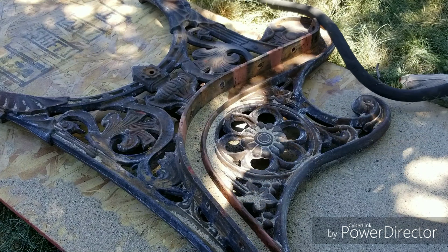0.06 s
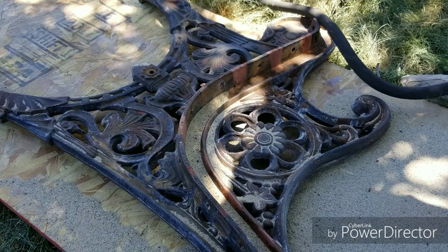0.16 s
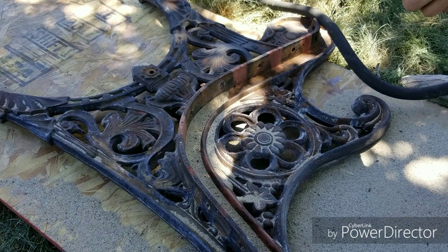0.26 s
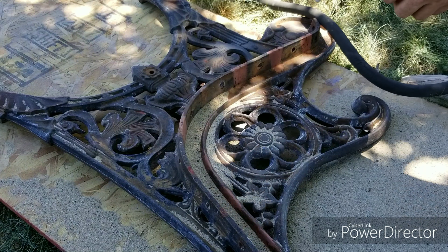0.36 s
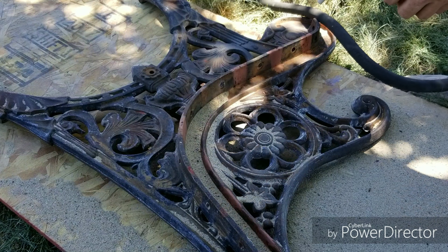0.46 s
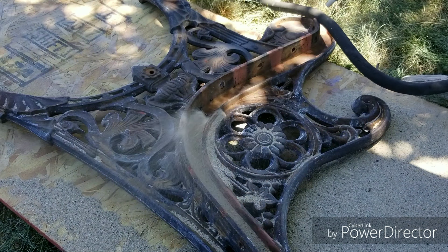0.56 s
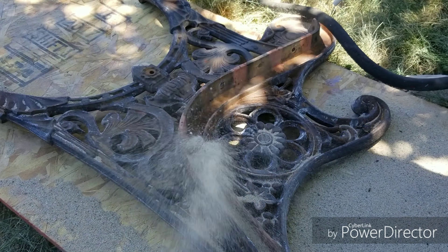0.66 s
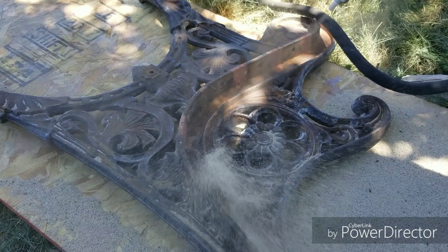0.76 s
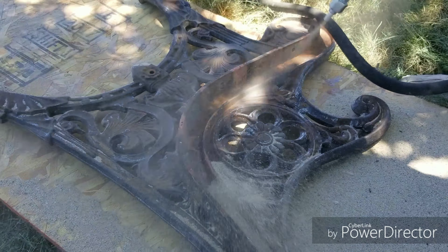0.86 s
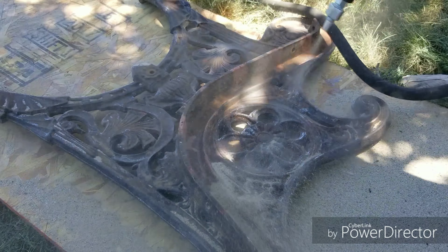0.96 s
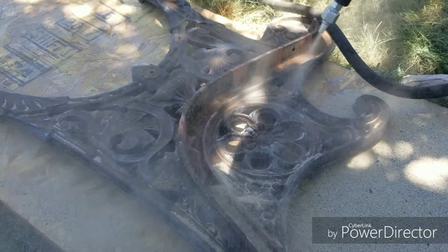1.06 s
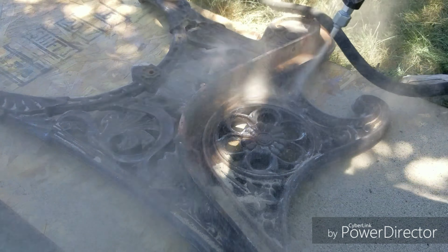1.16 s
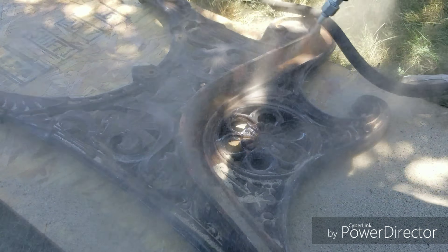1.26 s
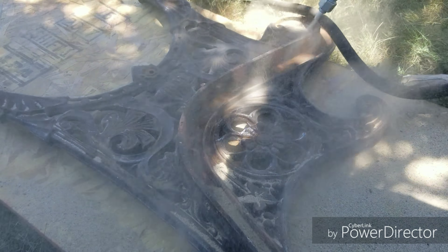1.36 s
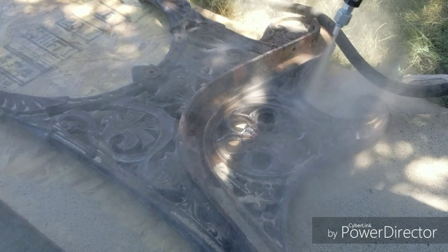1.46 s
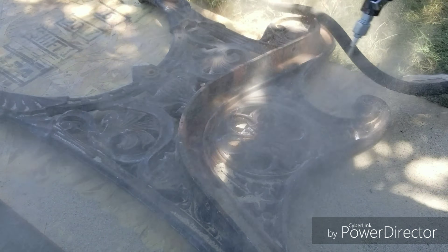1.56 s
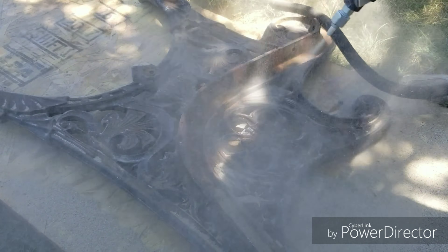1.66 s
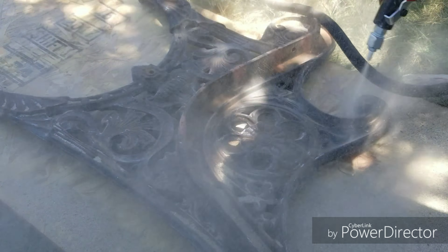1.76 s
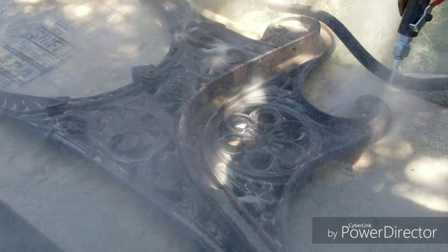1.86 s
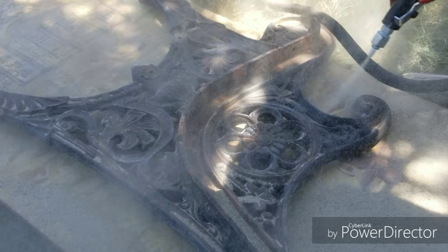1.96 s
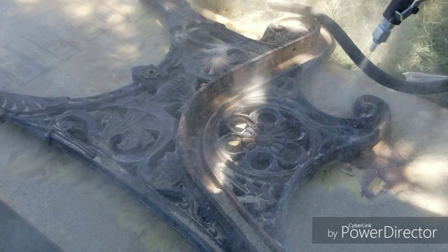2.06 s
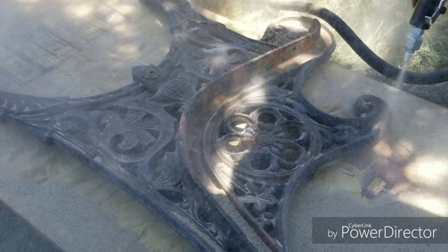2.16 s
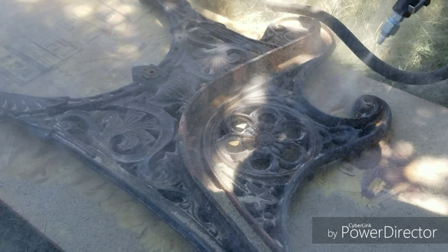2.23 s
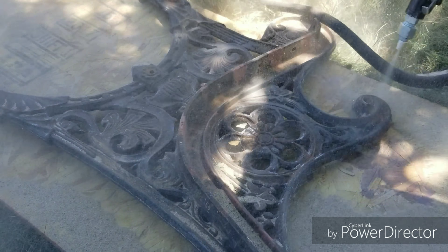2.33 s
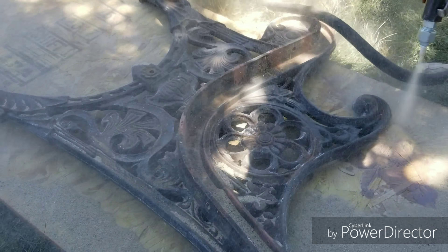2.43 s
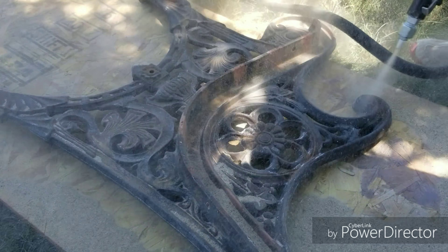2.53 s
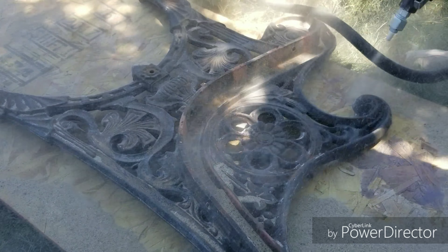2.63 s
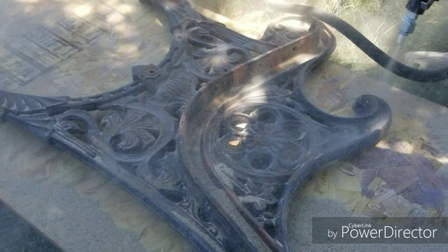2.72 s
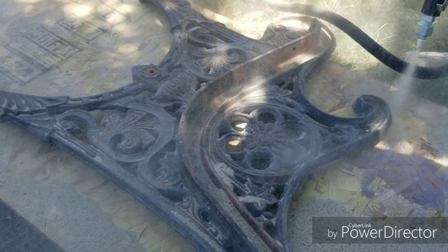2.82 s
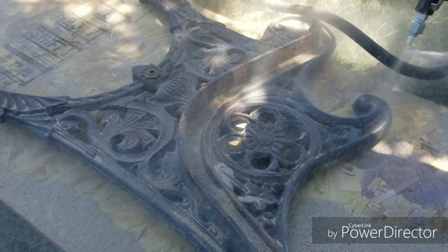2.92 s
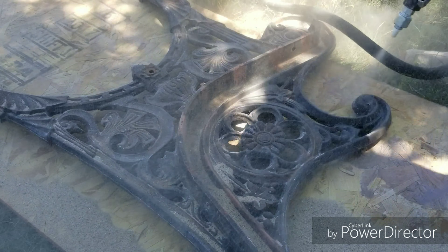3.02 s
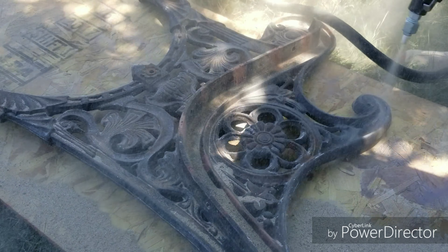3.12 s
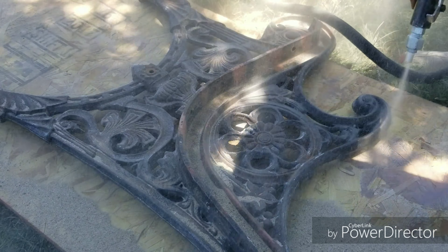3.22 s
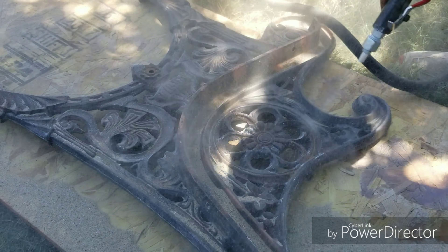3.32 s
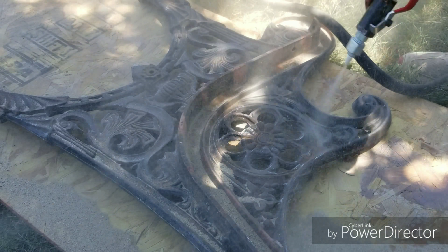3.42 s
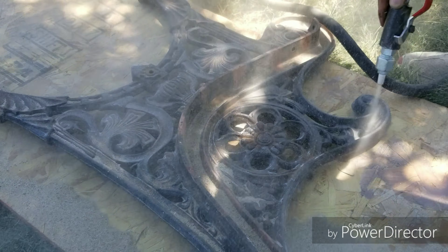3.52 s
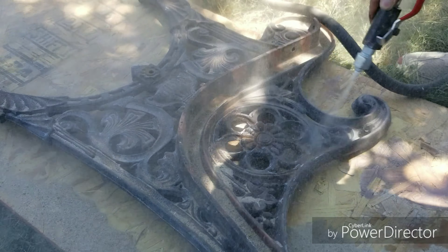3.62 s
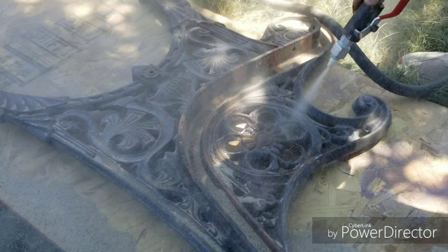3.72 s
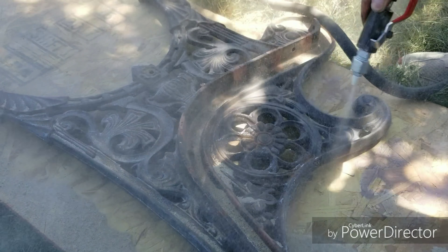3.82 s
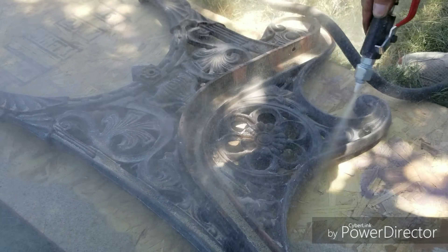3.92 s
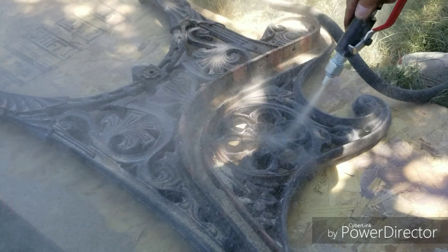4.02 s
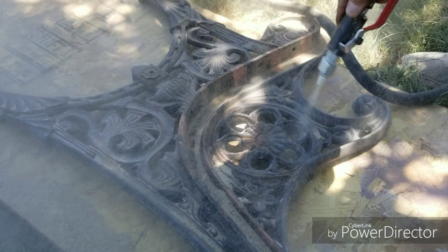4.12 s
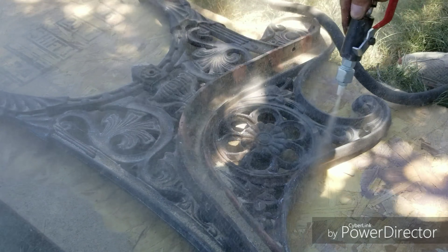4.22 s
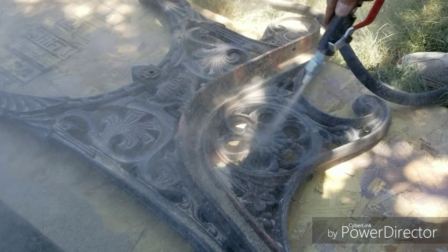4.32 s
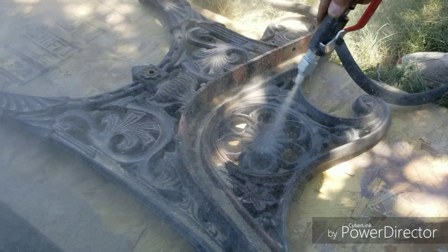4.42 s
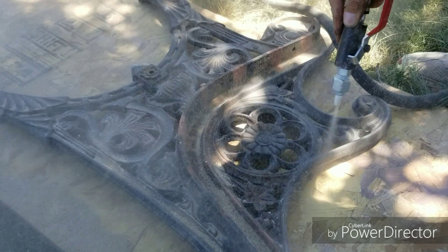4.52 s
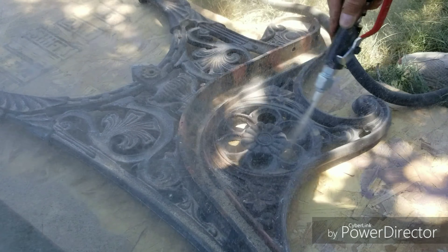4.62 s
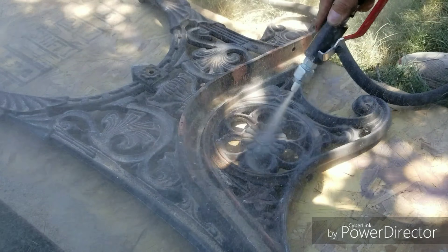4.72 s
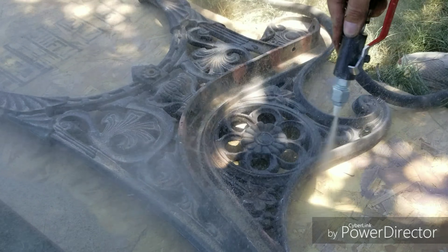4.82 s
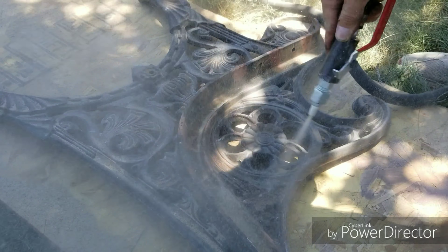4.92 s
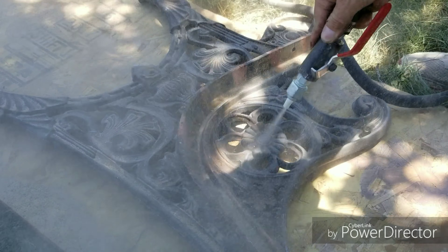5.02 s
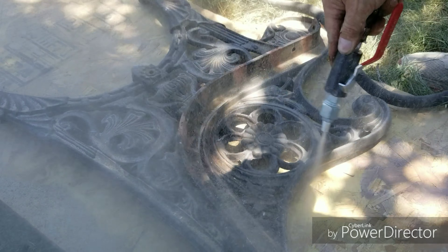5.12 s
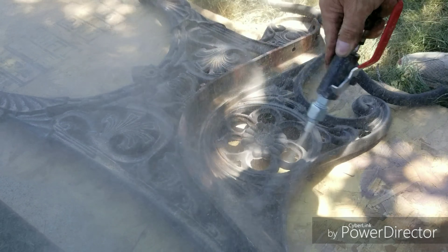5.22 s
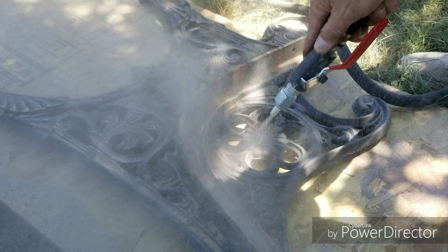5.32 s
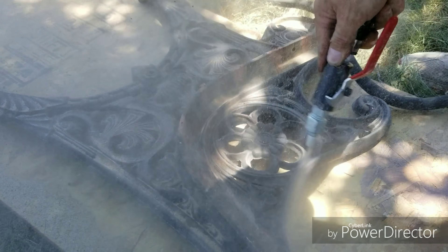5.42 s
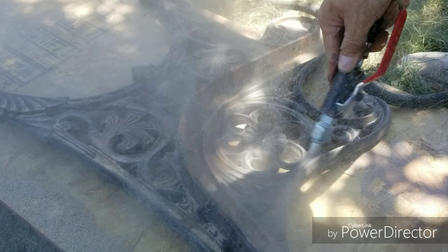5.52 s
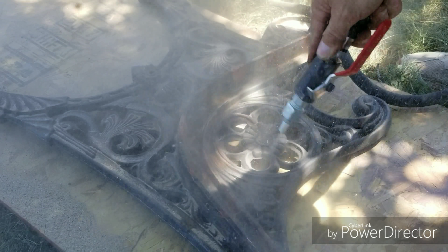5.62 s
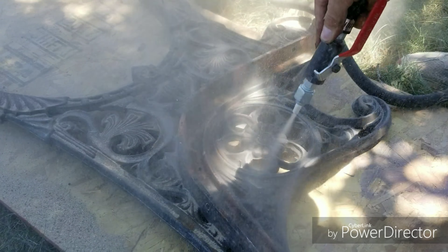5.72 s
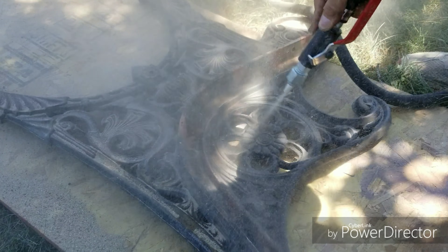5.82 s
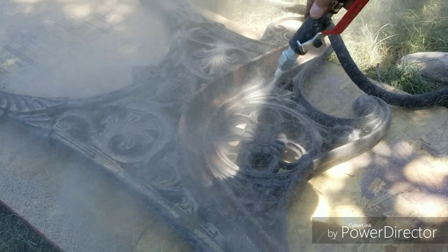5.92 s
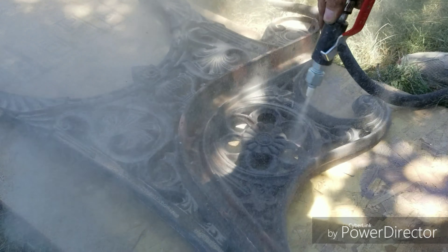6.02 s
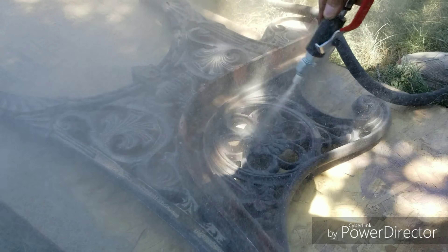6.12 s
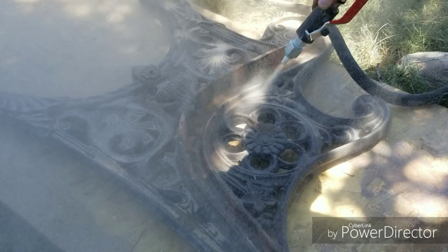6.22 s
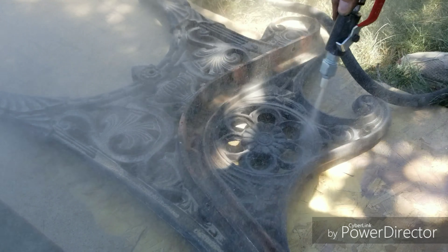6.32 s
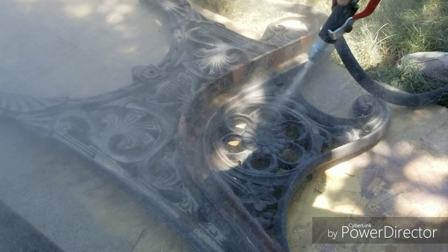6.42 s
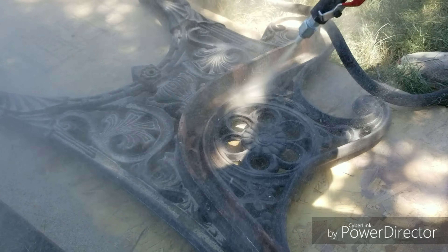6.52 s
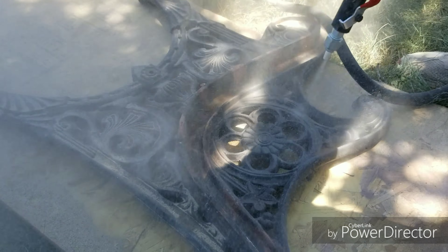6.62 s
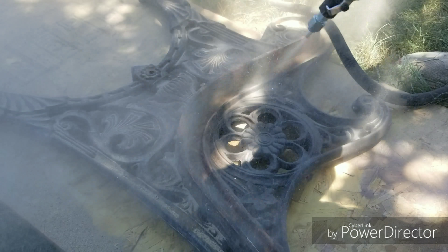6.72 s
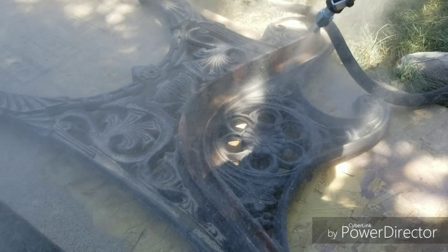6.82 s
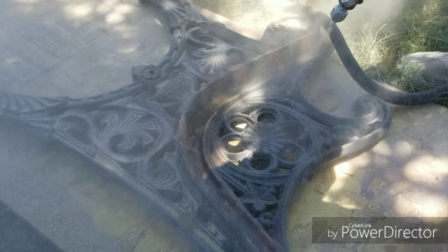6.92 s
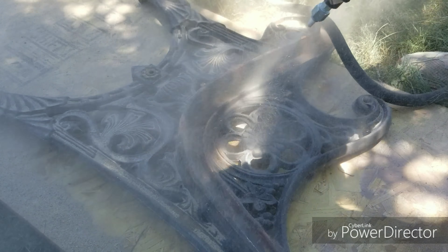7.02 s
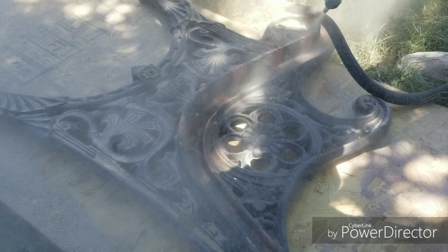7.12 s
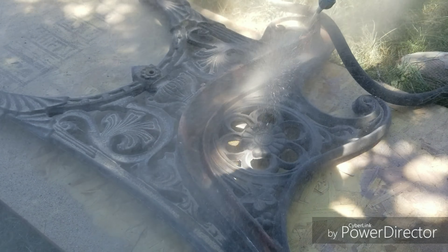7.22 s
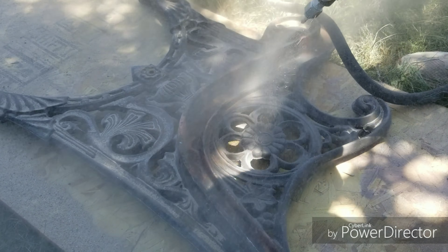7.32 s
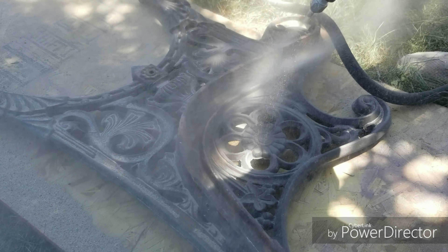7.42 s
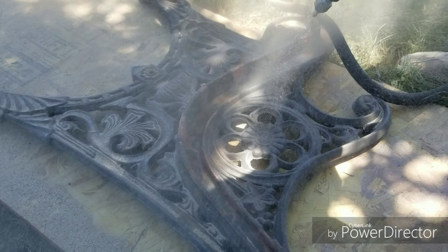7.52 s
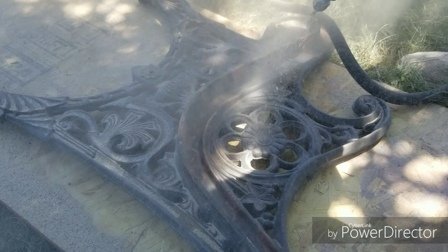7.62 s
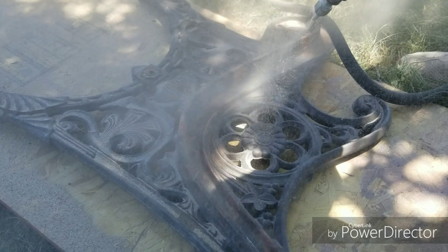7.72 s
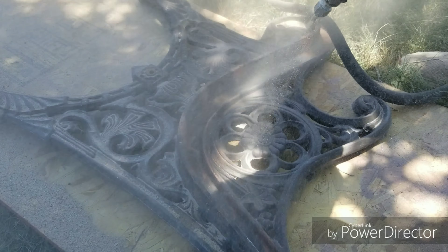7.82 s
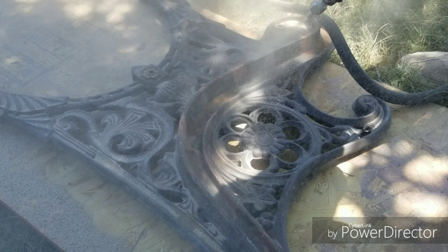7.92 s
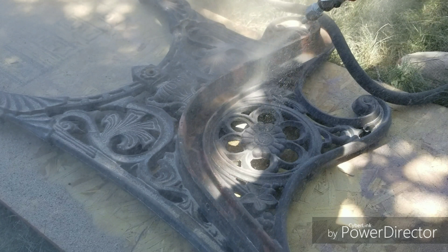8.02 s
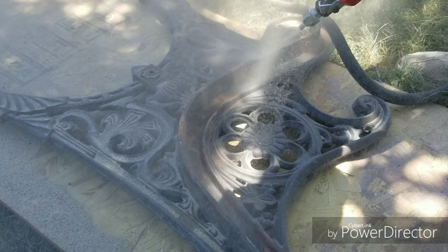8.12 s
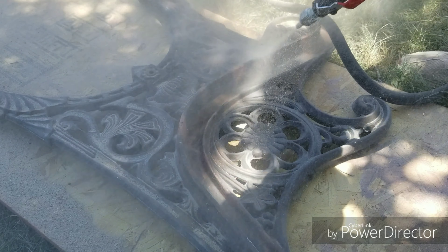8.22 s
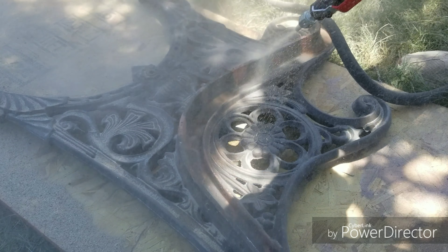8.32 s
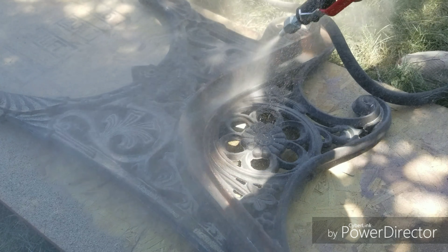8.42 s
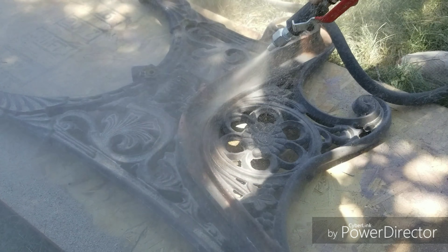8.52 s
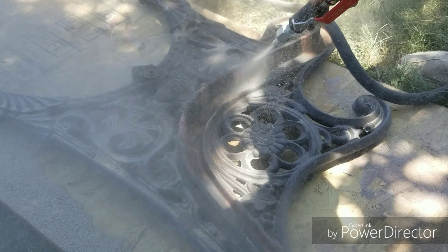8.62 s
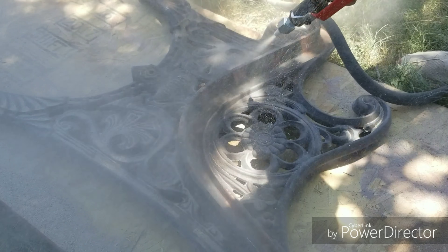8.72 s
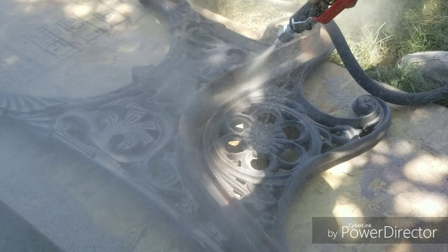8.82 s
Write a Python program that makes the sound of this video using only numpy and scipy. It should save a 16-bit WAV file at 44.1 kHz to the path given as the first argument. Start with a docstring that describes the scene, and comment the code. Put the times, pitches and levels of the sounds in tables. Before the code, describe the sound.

Quiet leaking air and a far rumble come first, then a sudden, dense jet of air and sand buries them. Sharp nozzle hiss, grains rattling finely on iron and a coarse mid roar in its hollows fluctuate in quick irregular slugs. Occasional soft low bumps of gusting air hit the microphones. Open air without reverberation, heard an arm's length away on a two-microphone phone; the blast continues to the end.

```python
"""Outdoors, a fitting leaks singing air over a distant rumble, both shaped from noise, until the gun's valve opens.
The leak and rumble then sink under the blast, taken an arm's length from a two-microphone phone.
Sand reaches a cast-iron piece in slugs, about eleven a second, with short lulls and jumps in level as the gun
sweeps: the nozzle hisses, grains patter on the iron and the jet roars in its hollows, all from uneven grains.
Now and then a gust off the iron bumps the phone with a few soft low cycles."""
import sys
import numpy as np
from scipy import signal
from scipy.fft import rfft, irfft, next_fast_len
from scipy.io import wavfile
from scipy.ndimage import uniform_filter1d

SR = 44100
rng = np.random.default_rng(int(sys.argv[2]) if len(sys.argv) > 2 else 0)


def waveform_to_disk(signal):
    """Save audio, clipped to [-1, 1], as 16-bit WAV at the path in sys.argv[1]."""
    frames = np.transpose(np.atleast_2d(signal))
    scaled = np.clip(frames, -1, 1) * 32767
    samples = np.round(scaled).astype(np.int16)
    wavfile.write(sys.argv[1], SR, samples)


N = 391166

# Distant rumble, spectrum shape: pitch_hz, relative density_db (per Hz)
RUMBLE_SHAPE = [(15, -42), (25, -30), (52, -10.5), (75, -8.5), (129, -14), (170, -18.5), (201, -19),
                (267, -29), (326, -25), (533, -34), (689, -26), (1610, -34), (2800, -34), (3640, -67),
                (6160, -120)]
# Pipework resonances of the leak: pitch_hz, width_hz, relative level_db, left_minus_right_db
LEAK_MODES = [(3210, 200, -51.5, -2), (3860, 500, -73, -1), (5280, 140, -52, 1), (6440, 700, -62, -3),
              (7560, 110, -47, -14), (9800, 320, -50.5, -7), (10800, 640, -47.5, -2), (13300, 310, -42, 0),
              (14750, 600, -44, -5)]
# Gusts off the iron bump the phone: start_s, envelope peak level_db, pitch_hz, left_minus_right_db
GUST_THUMPS = [(1.523, -50, 334, -1.5), (1.663, -44, 282, -1.0), (2.219, -47, 334, -3.0),
               (2.374, -48, 272, -2.5), (2.501, -45, 218, -1.0), (3.308, -39, 237, -3.5),
               (3.458, -41, 299, -1.0), (3.569, -41, 336, -1.0), (3.733, -40, 320, -2.0),
               (4.029, -36, 270, -2.0), (4.147, -46, 296, -3.5), (4.301, -40, 323, -3.0),
               (4.518, -44, 291, -3.0), (4.715, -46, 307, -1.5), (4.892, -37, 256, -2.0),
               (5.031, -42, 275, -2.0), (5.244, -46, 253, -1.0), (5.627, -46, 196, -2.0),
               (5.716, -43, 339, -0.5), (5.812, -41, 318, -0.5), (6.087, -42, 234, -2.5),
               (7.257, -45, 318, -2.5), (7.638, -39, 326, -4.0), (7.903, -44, 318, -4.5),
               (8.409, -41, 320, -3.5), (8.524, -41, 334, -2.5)]
# Nozzle hiss, spectrum shape: pitch_hz, relative density_db (per Hz)
HISS_SHAPE = [(4200, -42), (6500, -7), (7800, -4), (8600, -7.5), (10000, -2.5), (11200, -2.5),
              (12000, -1.5), (13500, -1.5), (15000, 2), (16000, -3.5)]
# Grains on the iron, spectrum shape: pitch_hz, relative density_db (per Hz)
PATTER_SHAPE = [(1410, -20), (2400, -3), (2730, -1), (3590, -3.5), (5060, -2.5), (5750, -2), (7020, -2.5),
                (8190, -9.5), (9000, -7), (11700, -1.5), (19800, -120)]
# Jet in the hollows, spectrum shape: pitch_hz, relative density_db (per Hz)
ROAR_SHAPE = [(59, -59), (100, -25), (310, -10), (414, -11.5), (500, -4.5), (784, -8), (906, -7),
              (1510, -8), (2260, -10), (2730, -10.5), (3200, -16.5), (4160, -76), (7040, -120)]
# Stream between slugs, relative levels: time_s, hiss_db, patter_db, roar_db, low_over_roar_db
STEADY_STREAM = [(0.57, -14.5, -24, -40.5, -17), (0.7, -16, -22.5, -35, -11), (0.87, -14.5, -25, -39, -14),
                 (1.0, -21.5, -29, -37, -13), (1.2, -25.5, -29, -40, -14), (1.6, -30, -27, -38, -18),
                 (1.85, -34, -32.5, -39, -12), (2.3, -28.5, -28, -36.5, -8.5),
                 (3.0, -25, -28.5, -35.5, -10.5), (3.7, -35, -31, -41.5, -6.5), (4.3, -25, -31, -40.5, -9),
                 (5.0, -24.5, -31.5, -41.5, -11), (5.6, -29, -29, -37, -13),
                 (6.2, -20.5, -28.5, -37, -11.5), (6.8, -26.5, -25, -37.5, -9.5), (7.3, -23, -26, -39, -6),
                 (8.0, -23, -24, -29, -7), (8.87, -24.5, -23.5, -30.5, -10)]
# Slugs of sand: centre_s, half_length_s, roar pitch_hz, hiss_rise_db, patter_rise_db, roar_rise_db
SAND_SLUGS = [(0.656, 0.028, 1200, -1.5, 2, 4), (0.842, 0.032, 1200.0, -1, 2.5, 7),
              (0.895, 0.018, 1120.0, -1.5, 0, 14.5), (1.014, 0.011, 790.0, 3.5, 2.5, 5),
              (1.106, 0.011, 830.0, 5, 4.5, 10), (1.27, 0.02, 1280.0, -3, 2, 6),
              (1.519, 0.01, 960.0, -6, -1, 13), (1.624, 0.01, 1330.0, 0, 1.5, 0),
              (1.766, 0.013, 820.0, 2, 3.5, 5), (1.883, 0.012, 990.0, 0.5, 4, 7),
              (1.93, 0.013, 1780.0, 6, 7, 9), (2.01, 0.013, 1070.0, -1, 4, 11),
              (2.043, 0.018, 1260.0, 3, 3, 9), (2.104, 0.01, 650.0, 3.5, 3, 3),
              (2.165, 0.034, 960.0, 3, 1.5, 9.5), (2.246, 0.009, 860.0, 3, 4, 2),
              (2.318, 0.014, 784, 4, 0.5, 12), (2.39, 0.034, 970.0, 4, 2, 3.5),
              (2.45, 0.01, 1210.0, 7, 7, 14.5), (2.551, 0.0099, 1010.0, 6, 1.5, 14.5),
              (2.655, 0.018, 2570.0, 8, 0.5, 2), (2.77, 0.02, 1870.0, 4.5, -2, 0),
              (2.91, 0.025, 1000, 0.5, 0.5, 3), (3.012, 0.01, 870.0, 3, 1, 7),
              (3.088, 0.012, 1090.0, 2, 7, 8.5), (3.153, 0.015, 1000, 4, 0.5, 2),
              (3.262, 0.022, 1480.0, 5, 3, 4), (3.333, 0.026, 1020.0, 6.5, 3.5, 6),
              (3.403, 0.015, 1980.0, 7, 6, 12), (3.59, 0.037, 910.0, 6, 2.5, -0.5),
              (3.714, 0.025, 1150.0, 8, 1.5, 3.5), (3.769, 0.015, 1200.0, 8, 3, 8),
              (3.855, 0.015, 780.0, 9, 3, 7), (3.902, 0.02, 810.0, 9, 0, 6),
              (4.009, 0.029, 640.0, 5.5, -0.5, 2), (4.056, 0.0062, 1480.0, 5, 1, 8),
              (4.153, 0.026, 1120.0, 5, -1.5, 3), (4.205, 0.016, 1460.0, 2, 4.5, 14),
              (4.31, 0.014, 610.0, 4.5, 0.5, 10), (4.394, 0.019, 1500.0, 2, 5, 6.5),
              (4.467, 0.023, 760.0, 6, 1.5, 2), (4.564, 0.013, 1240.0, 3.5, 0, 5.5),
              (4.694, 0.0048, 1120.0, 7, 4.5, 13), (4.841, 0.031, 1350.0, 4, 5.5, 11.5),
              (4.959, 0.022, 1280, 0.5, 5, 11), (5.103, 0.016, 1370, 1, 5, 16),
              (5.278, 0.042, 1480.0, -0.5, 2, 7.5), (5.442, 0.015, 1430.0, 2, 2, 13.5),
              (5.585, 0.018, 1320.0, 7, 6, 13.5), (5.697, 0.03, 640.0, 6.5, 4, 2),
              (5.765, 0.012, 1360.0, 4, 4.5, 11.5), (5.902, 0.024, 1290.0, 5, 2, 9.5),
              (5.98, 0.016, 1140.0, 5, 1, 8), (6.043, 0.034, 1200, 0.5, 3, 9),
              (6.105, 0.016, 900.0, 4, 0.5, 1), (6.139, 0.0079, 700.0, 0, 4, 11),
              (6.287, 0.025, 880.0, 1.5, 2, 7), (6.396, 0.03, 720.0, 2, -0.5, 5),
              (6.507, 0.02, 1180.0, 3, 3, 4), (6.563, 0.01, 1380.0, 4, 4, 13),
              (6.712, 0.012, 1070.0, 7.5, 6, 13.5), (6.86, 0.027, 1800, -1, -0.5, 5.5),
              (6.912, 0.014, 1040.0, 6.5, 2, 11), (6.981, 0.0062, 820.0, 7, 3.5, 8),
              (7.035, 0.013, 1170.0, 6.5, 3, 17), (7.194, 0.01, 1550.0, 1, 5, 5),
              (7.239, 0.021, 1320.0, 1, 3, 16.5), (7.355, 0.037, 940, 1, 2, 16.5),
              (7.41, 0.017, 940, 4, 1, 7), (7.51, 0.013, 1100, 0, 0.5, 2), (7.62, 0.013, 1200, 1, -0.5, 4),
              (7.552, 0.045, 1220, 0, 0.5, 13), (7.711, 0.028, 1110, 3, 1.5, 14.5),
              (7.84, 0.025, 1000.0, 1, 1, 13.5), (7.895, 0.0099, 1500, 2, 0, 4),
              (7.929, 0.01, 1070.0, 0, 0, 9), (8.056, 0.038, 1410.0, 2.5, 1.5, 15.5),
              (8.12, 0.017, 1100, 0, 0.5, 4.5), (8.192, 0.014, 1100.0, 5.5, -0.5, 10),
              (8.256, 0.012, 1920.0, 5.5, 4, 1), (8.388, 0.021, 1140, 2.5, 1, 9),
              (8.428, 0.012, 810.0, 5.5, 0, 9), (8.545, 0.051, 1350.0, 1.5, -1.5, 10.5),
              (8.64, 0.015, 1100, -1, -0.5, 2), (8.694, 0.015, 1160, 2, -1.5, 11.5),
              (8.792, 0.015, 1500, 2, 1.5, 16), (8.823, 0.011, 1000, 2, -0.5, 15)]
# The stream runs thin: centre_s, half_length_s, hiss_drop_db, patter_drop_db, roar_drop_db
THIN_MOMENTS = [(1.661, 0.024, 4, 5.5, 1), (1.967, 0.012, 1, -3, 2), (2.482, 0.012, -1, 2, 6),
                (2.583, 0.034, 1, 3.5, 6), (2.835, 0.02, 3, -1, -0.5), (2.97, 0.015, 3, 0, 2),
                (3.965, 0.012, 4, 1, 0), (4.504, 0.026, 2.5, 0, 2), (4.881, 0.012, 4, 4, 8),
                (5.224, 0.015, 2, 1.5, 3.5), (5.816, 0.035, 1, 0.5, 0), (5.635, 0.0064, 1, 3, 6),
                (6.162, 0.013, 3, -1.5, 4), (6.588, 0.0072, 5, 2.5, 3), (6.79, 0.031, -2, 1, 2.5),
                (7.062, 0.023, 7, 1.5, 5), (7.132, 0.034, -1, 0, 1), (7.31, 0.022, 4, -2, -1.5),
                (7.477, 0.012, 10, 0.5, 7), (7.804, 0.017, 3, 1, 12), (8.079, 0.014, 4, 2.5, 12),
                (8.322, 0.059, 0.5, 4, -2), (8.47, 0.019, 4, 2.5, 13), (8.599, 0.0095, 4, 1, 14),
                (8.742, 0.011, -1, 2.5, 12)]
# Very short rises and dips of the whole blast: centre_s, level_change_db
LEVEL_JUMPS = [(4.191, 1.5), (4.689, -4), (4.791, 6.5), (5.318, 5), (6.095, 5), (7.036, -1.5), (7.51, 2.5),
               (7.83, 1), (7.554, 5.5), (7.61, 5), (8.05, -0.5), (8.248, 3.5), (8.33, 2.5), (8.433, -1),
               (8.509, 7), (8.562, 2.5)]
# Level that steers the deepest roar: time_s, relative level_db
DEEP_ROAR = [(0.57, -29.5), (1.3, -48.5), (2.9, -47), (3.8, -45), (6.4, -44.5), (7.1, -47.5), (8.2, -45.5),
             (8.87, -46.5)]
# Sweep of the gun, resonances over their layer: time_s, hollow_hz, hollow_db, hiss_peak_hz, hiss_peak_db,
# rim_hz, rim_db, rib_hz, rib_db
GUN_SWEEP = [(0.57, 2140, -3, 13100, -22, 6900, -6, 4800, -10),
             (1.0, 1900, -4, 13700, -12, 6900, 0, 4750, -0.5),
             (1.25, 1900, -1, 13500, -1, 6900, -7, 4740, -2),
             (1.52, 1940, 0, 13300, 6.5, 6900, -3, 4700, -4.5),
             (2.09, 2000, -2, 12200, 11, 7100, -3, 4100, -15),
             (2.65, 2050, 5, 14100, 1.5, 7300, -3, 4060, -5),
             (3.13, 1780, -2.5, 13700, 4, 7100, -6, 4180, -2.5),
             (3.6, 1830, 9.5, 12300, 12.5, 7240, 1.5, 3840, -3),
             (4.1, 1720, 7, 13300, 5.5, 7000, 7.5, 4100, 3), (4.6, 1640, 10, 13300, -2, 6900, 6, 4140, 0),
             (5.14, 1660, 9.5, 13000, 2.5, 6600, -12, 4300, 2),
             (5.45, 1610, 5, 13400, 6, 6540, 10, 4200, 1),
             (5.89, 1610, 6.5, 13200, -9, 6400, -4.5, 4350, -5),
             (6.35, 1600, 6.5, 13800, -11, 6900, 5.5, 4300, -2),
             (6.8, 2060, 2.5, 13400, 3.5, 6800, -12, 4860, -9),
             (7.11, 2100, 2, 12400, 0.5, 6960, -15, 4660, -13),
             (7.83, 2050, -7, 11300, 2.5, 6800, -7, 4730, -8.5),
             (8.35, 2010, -11, 11700, 0, 6900, -8, 4670, -5),
             (8.87, 1900, -2, 13100, -4, 6900, -9, 4660, -25)]
# Where the jet lands: time_s, left_lag_ms, share heard alike by both microphones (0-1), left_minus_right_db
LANDING_SPOT = [(.6, 0.006, 0.53, -2.5), (1.2, 0.038, 1, -0.5), (2, 0.1, 1, -0.5), (3.3, 0.13, 0.96, -0.5),
                (4.2, 0.08, 0.98, -0.5), (5, 0.049, 1, -0.1), (8.87, 0.02, 0.97, -0.5)]
# Shading by the phone body: pitch_hz, left_minus_right_db (used about its mean)
PHONE_SHADE = [(60, 7), (110, 5), (200, 2), (380, 3), (700, 2.5), (1290, 3), (2380, 4.5), (4400, 3.5),
               (8120, 3), (15000, 5.5)]
# Likeness of the two microphones, before the share: pitch_hz, likeness (0-1)
MIC_LIKENESS = [(60, 0.96), (125, 0.86), (300, 0.84), (700, 0.91), (1600, 0.99), (3000, 0.9), (5000, 0.42),
                (15000, 0.62)]

WIN, HOP = 512, 192  # samples
BIN_HZ = np.maximum(np.fft.rfftfreq(WIN, 1 / SR), 1)[:, None]
FRAME_S = np.arange(-(-N // HOP) + 1) * HOP / SR
HALF_SIDES = np.array([.5, -.5])[:, None, None]  # left, right

VALVE_S, VALVE_RISE_S = 0.552, 0.013
# rumble and leak hold, then sink away under the blast
BACKGROUND_DB, SINKS_FROM_S, SINK_DB_PER_S, SUNK_DB = -48, 0.61, 33, -75.5
LEAK_OVER_RUMBLE_DB = 53  # gain put on the leak before the two sum
LEAK_FLICKER_DB, LEAK_FLICKER_RATE = 2.5, 28  # rate per s
THUMP_CYCLES = 1.5  # cycles to the envelope peak
WANDER_MS, WANDER_RATE = 0.046, 12  # random wander of the left lag in each band; rate per s
DRIFT_RATE = 38  # a second fast random flicker of band levels; rate per s
EDGE = 2.6  # squareness of a swell, 2 = round
JUMP_S = 0.0028  # half length of a level jump
# spread round a slug's pitch; part of its rise felt at all pitches, part added at its own
ROAR_OCTAVES, ROAR_BROAD, ROAR_EXTRA = 0.54, 0.53, 0.49
WAVER_DB, WAVER_RATE = 3.5, 30  # narrow bands of the whole blast waver at random; rate per s
BUFFET_DB, BUFFET_RATE, BUFFET_HZ = 6, 9, 110  # the bass comes in uneven gusts; rate per s
TOP_HZ = 15500


def undb(db):
    """Amplitude factor of a level in dB."""
    return 10 ** (np.asarray(db) / 20)


def unit(x):
    """Scale to an rms of 1."""
    return x / np.sqrt(np.mean(x ** 2))


def columns(table):
    """Table columns joined by straight lines in time, one value a frame."""
    s, *rest = np.transpose(table)
    return [np.interp(FRAME_S, s, column) for column in rest]


def at(table, hz):
    """Value of a spectrum table on a log-frequency axis."""
    table_hz, value = np.transpose(table)
    return np.interp(np.log(hz), np.log(np.maximum(table_hz, 1)), value)


def walk(rate, count=1):
    """Random levels held about 1 / rate s and smoothed twice; spread near 1."""
    hold = max(int(SR / HOP / rate), 1)
    held = np.repeat(rng.standard_normal((count, len(FRAME_S) // hold + 1)), hold, axis=1)
    smooth = uniform_filter1d(uniform_filter1d(held, hold), hold)
    return 1.29 * smooth[:, :len(FRAME_S)]


def bells(s, half_s):
    """One swell and fade in time for each event."""
    return np.exp(-.5 * np.abs((FRAME_S - s[:, None]) / half_s[:, None]) ** EDGE)


def bumps(table):
    """Sum of the rows' swells in dB, one for each dB column."""
    s, half_s, *db = np.transpose(table)
    return np.array(db) @ bells(s, half_s)


def delay(ms):
    """A delay turns the phase of each frequency."""
    return np.exp(-2j * np.pi * BIN_HZ * ms / 1000)


def ring(hz, width_hz, boost_db):
    """Gain of a resonance that stands out of a layer."""
    detune = (BIN_HZ - hz ** 2 / BIN_HZ) / width_hz
    return 1 + undb(boost_db) / np.sqrt(1 + detune ** 2)


def spectra_of(x):
    """Short-time spectra of each row."""
    return signal.stft(x, nperseg=WIN, noverlap=WIN - HOP)[2]


def spray(shape, count, grit_db, flicker_db, flicker_rate, drift_db, share, lag_ms):
    """Dense grains of uneven size; bands flicker alone, a part reaches both microphones alike."""
    size = next_fast_len(N)
    sizes = undb(grit_db * np.minimum(rng.standard_exponential((3, size)), 5.0))
    hz = np.maximum(np.fft.rfftfreq(size, 1 / SR), 1)
    colour = undb(at(shape, hz)) * (hz > shape[0][0])
    coloured = irfft(rfft(rng.standard_normal((3, size)) * sizes) * colour, size)
    both, *own = spectra_of(unit(coloured[:, :N]))

    # overlapping triangular bands, evenly spaced in log frequency
    centres = np.geomspace(shape[0][0], shape[-1][0], count)
    steps = np.log(BIN_HZ / centres) / np.log(centres[1] / centres[0])
    bands = np.maximum(1 - np.abs(steps), 0)

    alike = np.clip(share * at(MIC_LIKENESS, BIN_HZ), 0, 1)
    wander_ms = WANDER_MS * bands @ walk(WANDER_RATE, count=count)
    late = both * delay(lag_ms + wander_ms)
    pair = np.sqrt(alike) * np.array([late, both]) + np.sqrt(1 - alike) * np.array(own)
    flicker = flicker_db * bands @ walk(flicker_rate, count=count)
    drift = drift_db * bands @ walk(DRIFT_RATE, count=count)
    return pair * undb(flicker + drift)


def rumble():
    """A distant rumble: low-weighted noise whose bands waver quickly."""
    return spray(RUMBLE_SHAPE, count=14, grit_db=2.0, drift_db=1.0, flicker_db=2.5, flicker_rate=11,
                 share=1.0, lag_ms=0.14)


def leak():
    """Air escapes a fitting and sings in the wavering resonances of the pipework."""
    air = spectra_of(rng.standard_normal((2, N)))
    power = 0
    for hz, width_hz, db, pan_db in LEAK_MODES:
        centre = hz * (1 + 0.0069 * walk(14))
        peak = SR / (np.pi * width_hz) / (1 + (2 * (BIN_HZ - centre) / width_hz) ** 2)
        level_db = db + LEAK_FLICKER_DB * walk(LEAK_FLICKER_RATE) + HALF_SIDES * pan_db
        power = power + peak * undb(level_db) ** 2
    air = air * undb(2.8 * walk(30, count=len(BIN_HZ)))  # the hiss breaks up unevenly
    return air * np.sqrt(power / (1 + (2700 / BIN_HZ) ** 4.2))


def background():
    """Rumble and leak hold together, then sink at a steady rate in dB."""
    level_db = BACKGROUND_DB - SINK_DB_PER_S * (FRAME_S - SINKS_FROM_S)
    level_db = np.clip(level_db, SUNK_DB, BACKGROUND_DB)
    return undb(level_db) * (rumble() + undb(LEAK_OVER_RUMBLE_DB) * leak())


def thumps():
    """Each bump is a few soft cycles of low pressure."""
    out = np.zeros((2, N))
    for s, db, hz, pan_db in GUST_THUMPS:
        cycles = np.arange(int(6 * THUMP_CYCLES * SR / hz)) * hz / SR
        rise = cycles / THUMP_CYCLES
        phase = rng.random((2, 1)) * 0.27  # in cycles, differs between the microphones
        wave = rise * np.exp(1 - rise) * np.sin(2 * np.pi * (cycles + phase))
        gain = undb(db + HALF_SIDES[:, 0] * pan_db)
        i = int(s * SR)
        out[:, i:i + len(cycles)] += (gain * wave)[:, :N - i]
    return out


def slugs():
    """Rises in dB of hiss, patter and roar; the roar rises most at the pitch of the hollow a slug lands in."""
    s, half_s, hz, hiss_db, patter_db, roar_db = np.transpose(SAND_SLUGS)
    near = ROAR_BROAD + ROAR_EXTRA * np.exp(-.5 * (np.log2(BIN_HZ / hz) / ROAR_OCTAVES) ** 2)
    swells = bells(s, half_s)
    return [db @ swells for db in (hiss_db, patter_db, near * roar_db)]


def nozzle_hiss(level_db, peak_hz, peak_db, place):
    """Fast air and sand hiss at the nozzle, with a broad peak that moves with the sweep."""
    grains = spray(HISS_SHAPE, count=30, grit_db=3.0, drift_db=1.0, flicker_db=1.5, flicker_rate=55, **place)
    sputter_db = 1.25 * walk(76)
    return undb(level_db + 0.5 + sputter_db) * ring(peak_hz, 1870, peak_db) * grains


def iron_patter(level_db, rim_hz, rim_db, rib_hz, rib_db, place):
    """Grains strike the iron and excite the wavering rings of its rim and rib."""
    grains = spray(PATTER_SHAPE, count=40, grit_db=1.5, drift_db=1.0, flicker_db=1.5, flicker_rate=55, **place)
    rim = ring(rim_hz * (1 + 0.023 * walk(6.6)), 440, rim_db + 0.88 * walk(25))
    rib = ring(rib_hz * (1 + 0.023 * walk(14)), 570, rib_db + 0.96 * walk(25))
    sputter_db = 0.5 * walk(76)
    return undb(level_db + 0.5 + sputter_db) * rim * rib * grains


def hollow_roar(level_db, low_db, hollow_hz, hollow_db, place):
    """The jet's eddies roar in the hollows, which resonate above a separately levelled low part."""
    eddies = spray(ROAR_SHAPE, count=24, grit_db=2.5, drift_db=0.43, flicker_db=2.25, flicker_rate=44, **place)
    low = 1 / (1 + (BIN_HZ / 800) ** 5.7)
    upper_gain = undb(-2.5) * (1 - low) * ring(hollow_hz, 470, hollow_db)
    eddies = eddies * (upper_gain + undb(low_db + 6.5) * low)
    # the deepest eddies belong to the whole dust cloud: near 160 Hz they hardly follow the slugs,
    # below that they lean slightly against them
    deep = 1 / (1 + (BIN_HZ / 260) ** 1.29)
    deep_db = deep * 1.53 * (columns(DEEP_ROAR)[0] - level_db - low_db)
    return undb(level_db + deep_db + 1.07 * walk(76)) * eddies


def blast():
    """Hiss, patter and roar follow the slugs of sand and the sweep of the gun."""
    *steady_db, low_db = columns(STEADY_STREAM)
    layers = zip(steady_db, slugs(), bumps(THIN_MOMENTS))
    hiss_db, patter_db, roar_db = (steady + rise - drop for steady, rise, drop in layers)
    hollow_hz, hollow_db, peak_hz, peak_db, rim_hz, rim_db, rib_hz, rib_db = columns(GUN_SWEEP)
    lag_ms, share, pan_db = columns(LANDING_SPOT)
    place = dict(share=share, lag_ms=lag_ms)

    jet = nozzle_hiss(hiss_db, peak_hz, peak_db, place)
    jet = jet + iron_patter(patter_db, rim_hz, rim_db, rib_hz, rib_db, place)
    jet = jet + hollow_roar(roar_db, low_db, hollow_hz, hollow_db, place)

    # all three layers stutter and jump together
    jump_db = bumps([(s, JUMP_S, db) for s, db in LEVEL_JUMPS])[0]
    stutter_db = 0.65 * walk(76) + jump_db
    shade_db = at(PHONE_SHADE, BIN_HZ)
    side_db = HALF_SIDES * (shade_db - shade_db.mean() + pan_db)
    # the waver fades out below 1800 Hz, the buffet above BUFFET_HZ
    waver_db = WAVER_DB * walk(WAVER_RATE, count=len(BIN_HZ)) / (1 + (1800 / BIN_HZ) ** 2)
    buffet_db = BUFFET_DB * walk(BUFFET_RATE) / (1 + (BIN_HZ / BUFFET_HZ) ** 2)
    return jet * undb(stutter_db + side_db + waver_db + buffet_db)


def scene():
    """The background plays alone until the valve lets the blast through; thumps lie on top."""
    behind, jet = (signal.istft(spectra, nperseg=WIN, noverlap=WIN - HOP)[1][:, :N]
                   for spectra in (background(), blast()))
    valve = np.clip((np.arange(N) / SR - VALVE_S) / VALVE_RISE_S, 0, 1)
    return behind + thumps() + valve * jet


def record(dry):
    """The phone rounds the loudest peaks and cuts the top."""
    rounded = np.tanh(.9 * dry) / .9
    top_cut = signal.ellip(16, .3, 90, TOP_HZ, fs=SR, output="sos")
    return signal.sosfilt(top_cut, rounded)


dry = scene()
out = record(dry)
waveform_to_disk(out)
```